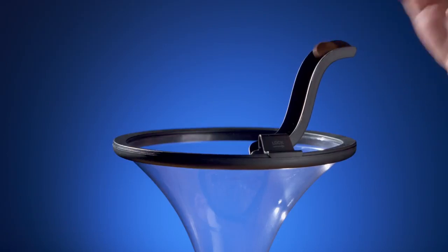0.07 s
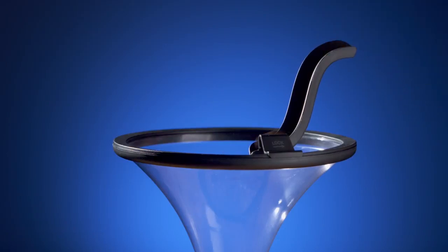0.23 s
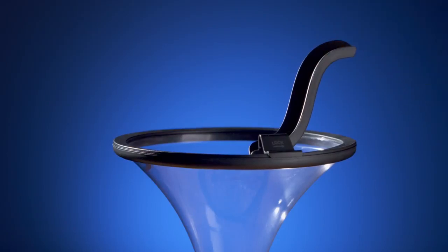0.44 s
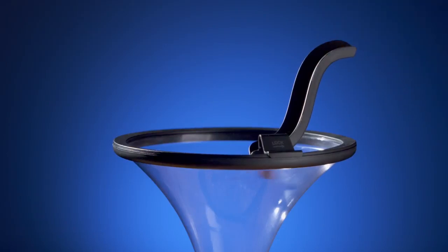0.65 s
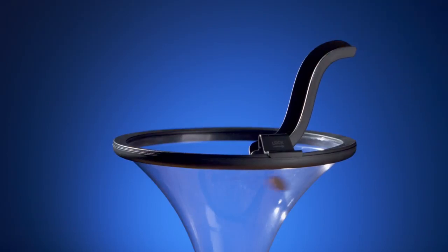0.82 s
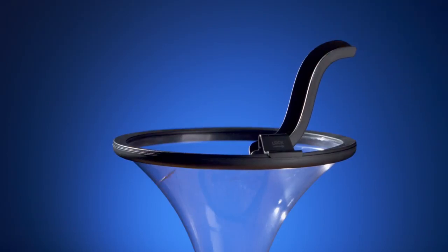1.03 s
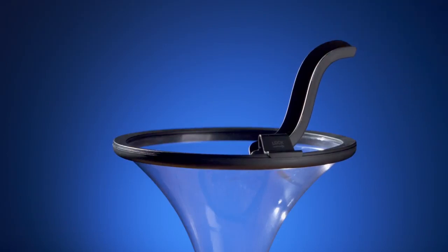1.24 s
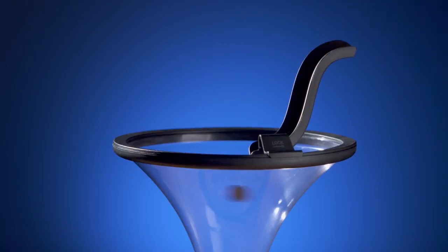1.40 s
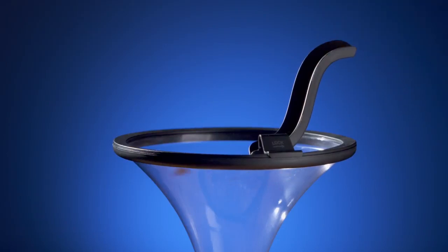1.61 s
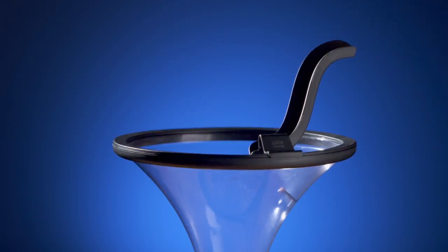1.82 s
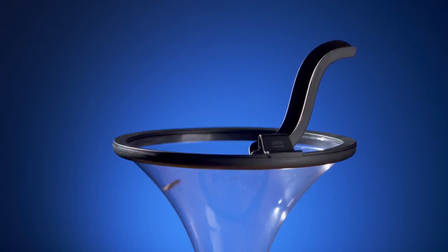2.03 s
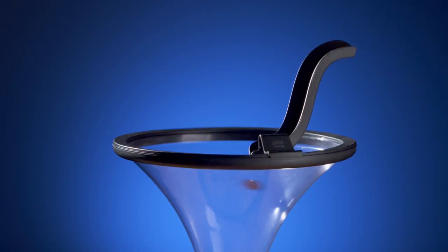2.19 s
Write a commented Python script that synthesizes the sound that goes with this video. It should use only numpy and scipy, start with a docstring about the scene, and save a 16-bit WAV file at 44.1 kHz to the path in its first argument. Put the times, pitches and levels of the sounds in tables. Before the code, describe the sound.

A coin slips faintly over a low room rumble, then rattles down a plastic ramp with sharp clicks from about 0.4 seconds. At 0.6 seconds it drops into a plastic funnel and bounces with several hollow clacks. From 0.8 seconds until the end, around 2.3 seconds, it circles on its edge with a softer, grainy whirr that swells and fades, knocking lightly between 1.2 and 1.6 seconds.

```python
"""A plastic ramp and a wide plastic funnel indoors, heard close up from one fixed microphone.
A low room rumble comes in as a coin, let go at the top of the ramp, slips softly twice.
It rattles down, thuds through the ramp's foot, drops into the funnel and bounces a few times.
Then it rolls round on its edge: a fine grain that rings the funnel wall and swells twice a lap,
with a few light knocks on the way."""
import sys
import numpy as np
from scipy import signal
from scipy.io import wavfile
from scipy.ndimage import uniform_filter1d, map_coordinates

SR = 44100
rng = np.random.default_rng(int(sys.argv[2]) if len(sys.argv) > 2 else 0)


def master_out(mix):
    """Clip the mix to full scale and print it as 16-bit PCM to the path in sys.argv[1]."""
    frames = np.transpose(np.atleast_2d(mix))
    ceiling = np.clip(frames, -1, 1)
    pcm = np.round(ceiling * 32767).astype(np.int16)
    wavfile.write(sys.argv[1], SR, pcm)


N = 103635
TIME = np.arange(N) / SR
RING_TIME = TIME[:SR // 3]  # seconds since a blow
IMPULSE = RING_TIME == 0


def amp(db):
    """Decibels to gain."""
    return 10 ** (np.asarray(db) / 20)


def unit(x):
    """Scales to rms 1."""
    return x / np.sqrt(np.mean(x ** 2) + 1e-20)


def add(mix, start_s, sound):
    """Mixes a sound in at its start time."""
    part = mix[max(round(start_s * SR), 0):][:len(sound)]
    part += sound[:len(part)]


def colour(x, spectrum, size=4096):
    """Causal filter of unit energy through (frequency [Hz], level [dB]) points."""
    points_hz, points_db = np.transpose(spectrum)
    hz = abs(np.fft.fftfreq(size, 1 / SR))
    log_gain = np.log(amp(np.interp(np.log(hz + 1), np.log(points_hz), points_db)))
    minimum_phase = np.exp(np.conj(signal.hilbert(log_gain)))
    taps = np.fft.ifft(minimum_phase).real
    return signal.fftconvolve(x, taps / np.linalg.norm(taps))[:len(x)]


def grains(spread_db=3.5, per_s=14000):
    """Tiny impacts of the coin's edge, of uneven size."""
    size = amp(spread_db * np.minimum(rng.exponential(1, N), 5))
    sign = rng.choice([-1., 1.], N)
    hits = rng.random(N) < per_s / SR
    return unit(size * sign * hits)


def burst(t60, tail_db, tail_t60):
    """Crowded plastic modes: a quick decay and a weaker, longer tail."""
    decay = amp(-60 * RING_TIME / t60)
    tail = amp(tail_db - 60 * RING_TIME / tail_t60)
    return rng.choice([-1., 1.], len(RING_TIME)) * np.hypot(decay, tail)


def ring(modes, spread_db=3):
    """Dying sines; their strengths depend on where the blow lands."""
    out = np.zeros(len(RING_TIME))
    for hz, db, t60 in modes:
        envelope = amp(db + spread_db * rng.uniform(-1, 1) - 60 * RING_TIME / t60)
        out += envelope * np.sin(2 * np.pi * (hz * RING_TIME + rng.random()))
    return out


def rise(seconds):
    """Soft onset of a blow, with this time constant."""
    return 1 - np.exp(-RING_TIME / seconds)


# slips at the top of the ramp (time [s], length [s], level [dB])
SLIPS = [(0.099, 0.028, -58.5), (0.378, 0.053, -60)]
# their scrape at the microphone (frequency [Hz], level [dB])
SLIP_SPECTRUM = [(200, -5), (950, -6.5), (1200, -7), (1700, -4.5), (2050, -11), (2450, -3.5), (3200, -18.5),
                 (5000, -25), (16000, -36)]


def slips():
    """At the top of the ramp, the coin slips softly before it gathers speed."""
    out = np.zeros(N)
    for start_s, length_s, db in SLIPS:
        count = int(length_s * SR)
        scrape = colour(grains(), SLIP_SPECTRUM)[:count]
        add(out, start_s, amp(db) * np.hanning(count) * scrape)
    return out


# room tone (frequency [Hz], level [dB])
RUMBLE_SPECTRUM = [(5, -31.5), (15, 8), (25, -8.5), (40, -4), (52, 1), (62, -5), (95, -14.5), (130, -25),
                   (250, -39.5), (600, -48), (2000, -58), (6000, -66.5), (16000, -71.5)]


def room(start_s=.099, rumble_db=-45.5, hum_db=-53.5, hum_hz=52.95, waver_hz=5.05):
    """All round the microphone: low rumble with a wavering hum and a trace of hiss."""
    rumble = unit(colour(rng.standard_normal(2 * N), RUMBLE_SPECTRUM, size=32768)[N:])
    waver = unit(uniform_filter1d(rng.standard_normal(N), size=4000))
    hum = unit(np.sin(2 * np.pi * np.cumsum(hum_hz + waver_hz * waver) / SR))
    onset = np.clip((TIME - start_s) / 0.00043, 0, 1)
    return (amp(rumble_db) * rumble + amp(hum_db) * hum) * onset


# knocks down the ramp (time [s], edge level [dB], click level [dB], body level [dB])
RAMP_KNOCKS = [(0.4217, -26, -43, -37), (0.4245, -55, -34, -33.5), (0.4325, -34.5, -41, -39.5),
               (0.4423, -41, -48, -39.5), (0.4867, -33, -32.5, -37), (0.505, -40, -43, -42.5),
               (.5118, -32, -35, -40.5), (0.5174, -24.5, -27, -29.5), (0.5283, -24.5, -32.5, -31.5),
               (.5372, -31, -30, -31.5), (.5438, -31, -31, -30.5), (0.5465, -24, -28.5, -32.5),
               (0.5491, -44, -47, -27), (0.556, -39, -43, -39)]
# the three parts of a knock (frequency [Hz], level [dB])
EDGE_SPECTRUM = [(2000, -37), (8000, -16), (9300, -4.5), (10500, -3), (11800, -9.5), (13000, -13),
                 (15800, -14.5)]
CLICK_SPECTRUM = [(300, -8), (1500, -32), (2600, -10), (3100, -4), (3700, -2.5), (4300, -14), (5200, 2.5),
                  (5700, -9), (7100, 4.5), (7900, -5), (8600, -5.5), (13000, -31), (16000, -31)]
BODY_SPECTRUM = [(100, -24), (240, -10), (420, -9.5), (600, 5), (850, 4.5), (1200, -2), (1800, 10.5),
                 (2600, -2), (4300, 1), (8000, -7.5), (16000, -52)]
# ring of the coin and of the ramp (frequency [Hz], level [dB], t60 [s])
COIN_RING = [(6270, -22, .08), (6928, -16, .08), (7030, -20, .08), (7175, -22, .1), (9340, -22, .08),
             (10550, -20, .07), (11600, -23, .055), (15620, -26, .09)]
RAMP_RING = [(238.6, -19.5, 0.22), (751, -18, 0.18), (789, -18.5, 0.12), (959, -6.5, 0.064),
             (1590, -19.5, 0.21), (1746, -13, 0.037), (1940, -19, 0.13), (1822, -8.5, 0.083),
             (2950, -15, 0.11), (3760, -43, 0.11), (4620, -20.5, 0.1), (4900, -25, 0.065)]


def ramp_rattle():
    """Down the ramp, each knock gives a bright edge, the coin's ringing click and a hollow body."""
    out = np.zeros(N)
    snap = 0.91 * IMPULSE
    for start_s, edge_db, click_db, body_db in RAMP_KNOCKS:
        edge = colour(burst(t60=0.032, tail_db=-30, tail_t60=0.27) + snap, EDGE_SPECTRUM)
        click = colour(burst(t60=0.046, tail_db=-37, tail_t60=0.13) + snap, CLICK_SPECTRUM)
        click += ring(COIN_RING)
        body = colour(burst(t60=0.048, tail_db=-21, tail_t60=0.3), BODY_SPECTRUM)
        body += ring(RAMP_RING)
        add(out, start_s, amp(edge_db) * edge + amp(click_db) * click + amp(body_db) * body)
    return out


# low ring at the ramp's foot (frequency [Hz], level [dB], t60 [s])
FOOT_RING = [(170, -6, 0.068), (228.3, -3, 0.13), (285, 4.5, 0.057)]


def foot_thud(start_s=.539, db=-31):
    """At its foot, the ramp flexes as the coin presses through the curve."""
    out = np.zeros(N)
    add(out, start_s, amp(db) * ring(FOOT_RING) * rise(0.0054))
    return out


# hits in the funnel (time [s], tick level [dB], clack level [dB], thump level [dB], boom level [dB])
FUNNEL_HITS = [(0.621, -25, -20, -25.5, -22.5), (0.6798, -30.5, -13, -34.5, -28),
               (0.7059, -34.5, -16.5, -35, -44), (0.7289, -34.5, -22, -35, -32),
               (0.7597, -35, -30, -34.5, -38), (0.7732, -40.5, -30, -50, -38),
               (0.782, -51, -41, -52, -40.5), (0.7907, -41, -40, -44, -44), (1.2354, -44, -37, -52, -70),
               (1.567, -48.5, -64, -57, -66)]
# the noisy parts of a hit (frequency [Hz], level [dB])
TICK_SPECTRUM = [(200, 1.5), (1500, 8), (4500, -0.5), (6500, -4.5), (9000, -6), (12000, -13), (16000, -15)]
CLACK_SPECTRUM = [(200, -22), (800, 3), (1500, -26), (1950, -1), (2650, 4), (3200, 5.5), (3900, 9),
                  (5500, 5), (9000, -43), (16000, -48)]
THUMP_SPECTRUM = [(80, -10), (300, -20), (500, -1.5), (750, 12), (1150, -4.5), (1500, 5), (3000, -9.5),
                  (8000, -27), (16000, -51)]
# ring of the wall and of the whole funnel (frequency [Hz], level [dB], t60 [s])
CLACK_RING = [(1915, -6.5, 0.02), (2180, -23.5, 0.046), (3034, -10, 0.013), (3245, -13, 0.018),
              (3740, -9, 0.0093)]
BOOM_RING = [(153, -23.5, 0.19), (251.4, -7.5, 0.088), (306.7, -4.5, 0.092), (384.4, -22, 0.22)]


def bounces():
    """In the funnel: a contact tick, then the wall's clack, a dull thump and a low boom."""
    out = np.zeros(N)
    onset = rise(0.0014)
    for start_s, tick_db, clack_db, thump_db, boom_db in FUNNEL_HITS:
        tick = colour(burst(t60=0.013, tail_db=-17.5, tail_t60=0.098) + 5 * IMPULSE, TICK_SPECTRUM)
        clack_noise = colour(onset * burst(t60=0.0095, tail_db=-36, tail_t60=0.16), CLACK_SPECTRUM)
        clack = amp(-9.5) * clack_noise + onset * ring(CLACK_RING)
        thump = colour(onset * burst(t60=0.036, tail_db=-11, tail_t60=0.12), THUMP_SPECTRUM)
        boom = ring(BOOM_RING) * rise(0.0081)
        hit = amp(tick_db) * tick + amp(clack_db) * clack + amp(thump_db) * thump + amp(boom_db) * boom
        add(out, start_s, hit)
    return out


def level(points):
    """Gain over time from (time [s], level [dB]) points."""
    return amp(np.interp(TIME, *np.transpose(points)))


def wall(resonances):
    """Rolling grains ring a group of the wall's steep, two-stage resonances."""
    out = np.zeros(N)
    for hz, width_hz, db in resonances:
        b, a = signal.iirpeak(hz, hz / (1.28 * width_hz), SR)
        first_stage = signal.lfilter(b, a, grains())
        out += amp(db) * unit(signal.lfilter(b, a, first_stage))
    return out


# paths round the wall to the microphone (delay [s], swing [s], share [ratio], lag [laps])
WALL_PATHS = [(.00063, .00016, -.28, .5), (.00114, .00036, -.33, .02), (.0024, .0008, .45, .5),
              (.0046, .0012, .4, .05)]


def circling(x, lap_s=.466, nearest_s=1.655):
    """Paths round the wall lengthen and shorten as the coin circles, so the sound phases."""
    laps = (TIME - nearest_s) / lap_s
    for delay_s, swing_s, share, lag in WALL_PATHS:
        late_s = delay_s + swing_s * np.cos(2 * np.pi * (laps - lag))
        delayed = map_coordinates(x, [(TIME - late_s) * SR], order=3)
        x = (x + share * delayed) / np.hypot(1, share)
    return x


# four groups of wall resonances, low to high (frequency [Hz], width [Hz], level [dB])
DRONE_BANDS = [(242, 80, -7.5), (318, 32, -5), (465, 78, -7)]
HOLLOW_BANDS = [(554.4, 37, -11.5), (696.4, 84, -3.5), (776.6, 68, -8)]
MIDDLE_BANDS = [(1281.5, 23, -9.5), (1370, 120, -7), (1632, 180, -10), (1839, 45, -8.5), (2024, 490, -5),
                (2515, 50, -14), (2653, 75, -10)]
WHIRR_BANDS = [(2982, 65, -12.5), (3378, 110, -4.5), (3742, 65, -9.5), (4000, 126, -8), (4320, 220, -14)]
# their swells at the microphone; the treble's shapes both whirr and grit (time [s], level [dB])
DRONE_SWELLS = [(0.82, -71), (1.07, -59), (1.096, -65), (1.344, -59), (1.368, -67), (1.556, -58),
                (1.59, -70), (1.638, -55.5), (1.834, -67), (1.932, -53.5), (2.046, -60.5), (2.35, -53.5)]
HOLLOW_SWELLS = [(.8, -55), (.838, -59.5), (.87, -49.5), (1.0, -58), (1.04, -49), (1.12, -63), (1.16, -52),
                 (1.3, -56.5), (1.365, -58), (1.41, -49), (1.45, -59), (1.525, -49.5), (1.59, -61.5),
                 (1.75, -54.5), (1.85, -53.5), (1.915, -63), (1.97, -45.5), (2.02, -61), (2.19, -49),
                 (2.24, -58.5), (2.35, -59)]
MIDDLE_SWELLS = [(.8, -51.5), (.89, -52.5), (.97, -47.5), (1.1, -52), (1.21, -49.5), (1.27, -52.5),
                 (1.31, -50.5), (1.385, -58.5), (1.42, -47), (1.47, -51.5), (1.61, -52), (1.66, -47),
                 (1.71, -54.5), (1.88, -51.5), (2.04, -53.5), (2.1, -47.5), (2.15, -53.5), (2.35, -53)]
TREBLE_SWELLS = [(.78, -63), (.83, -53), (.93, -51), (1.0, -55), (1.12, -56.5), (1.18, -47), (1.24, -48.5),
                 (1.27, -55.5), (1.38, -53.5), (1.43, -49.5), (1.47, -58.5), (1.6, -55), (1.64, -46),
                 (1.68, -48), (1.74, -59), (1.82, -56.5), (1.88, -53), (1.96, -59), (2.06, -51),
                 (2.14, -50.5), (2.21, -59.5), (2.3, -52), (2.35, -55)]
# bright and dull grain of the rolling edge (frequency [Hz], level [dB])
GRIT_SPECTRUM = [(500, 0.5), (1800, -3.5), (3100, 10), (4000, 1.5), (4800, -1.5), (6000, -6), (8000, -13.5),
                 (11000, -16), (15500, -30)]
MURMUR_SPECTRUM = [(80, -8), (250, 4), (420, -16.5), (700, -10), (1050, -1.5), (1700, -3.5), (2400, -23.5),
                   (4000, -4.5), (16000, -35)]


def rolling(start_s=.755, rise_s=0.014):
    """Round the funnel, the coin's edge grinds on the wall, which answers in swelling resonances."""
    treble = level(TREBLE_SWELLS)
    whirr = amp(-3.5) * treble * wall(WHIRR_BANDS)
    grit = amp(-3) * treble * colour(grains(spread_db=7), GRIT_SPECTRUM)
    middle = level(MIDDLE_SWELLS) * wall(MIDDLE_BANDS)
    murmur = amp(-57.5) * colour(grains(), MURMUR_SPECTRUM)
    hollow = level(HOLLOW_SWELLS) * wall(HOLLOW_BANDS)
    drone = level(DRONE_SWELLS) * wall(DRONE_BANDS)
    phasing = circling(whirr + middle + murmur + grit / 2)
    direct = grit / 2 + hollow + drone
    return (phasing + direct) * np.clip((TIME - start_s) / rise_s, 0, 1)


# soft bump on the funnel wall (frequency [Hz], level [dB])
BUMP_SPECTRUM = [(250, -14.5), (550, -10), (780, 1), (1150, -4), (1500, -8), (4000, -20), (16000, -47)]


def bump(start_s=1.312, db=-35):
    """In mid-roll, the coin gives the wall one dull knock."""
    out = np.zeros(N)
    knock = colour(burst(t60=0.016, tail_db=-36, tail_t60=0.16), BUMP_SPECTRUM)
    add(out, start_s, amp(db) * knock)
    return out


def scene():
    """The coin's run over the room tone, in mono at the microphone."""
    coin = slips() + ramp_rattle() + foot_thud() + bounces() + rolling() + bump()
    return (coin + room())[None]


def record(dry, cutoff_hz=16000):
    """The recorder's band limit."""
    lowpass = signal.firwin(255, cutoff_hz, window=("kaiser", 8), fs=SR)
    return signal.oaconvolve(dry, lowpass[None], "same")


dry = scene()
out = record(dry)
master_out(out)
```